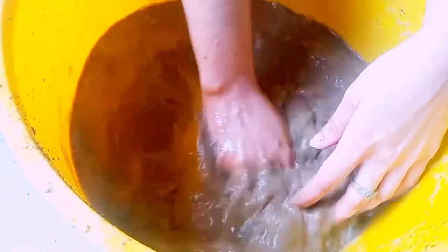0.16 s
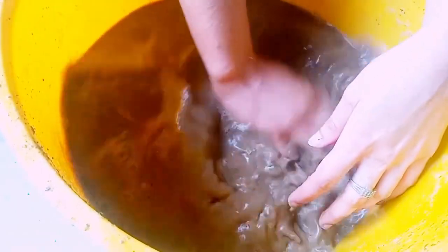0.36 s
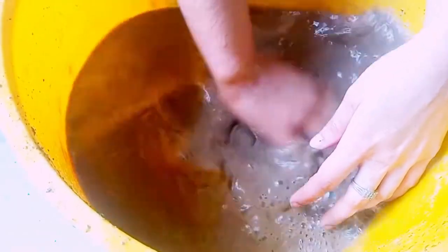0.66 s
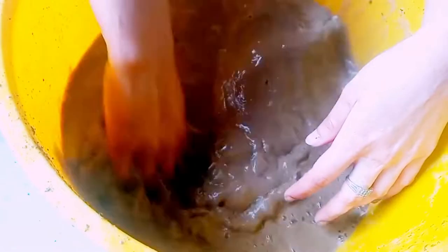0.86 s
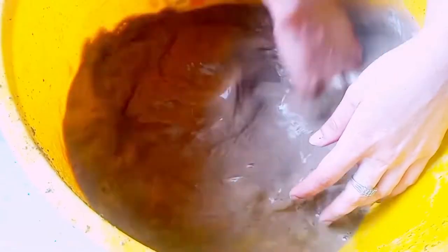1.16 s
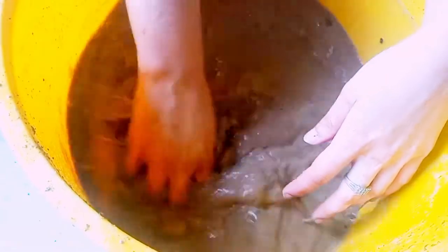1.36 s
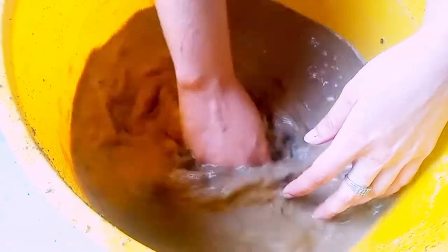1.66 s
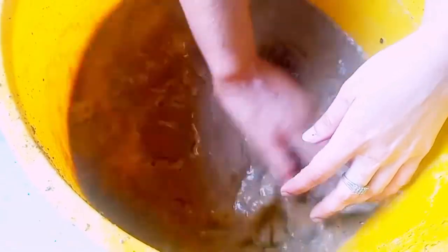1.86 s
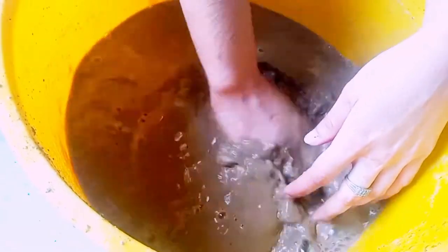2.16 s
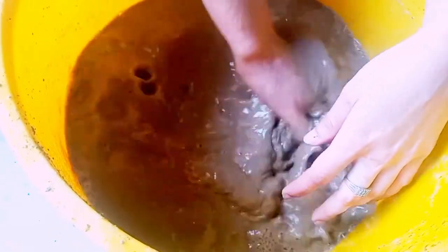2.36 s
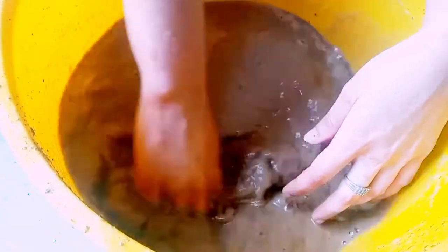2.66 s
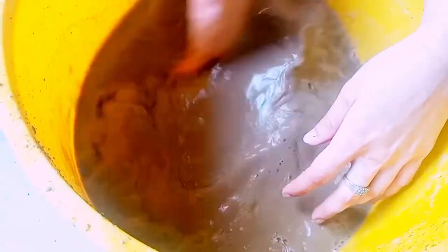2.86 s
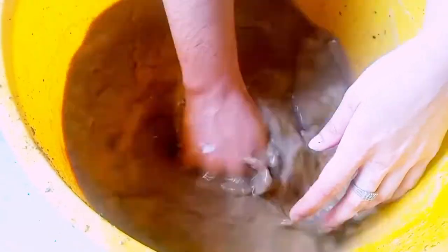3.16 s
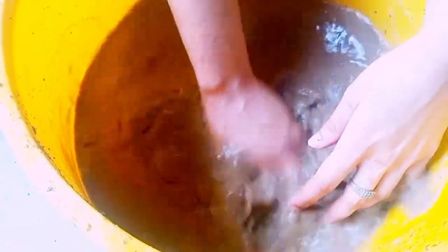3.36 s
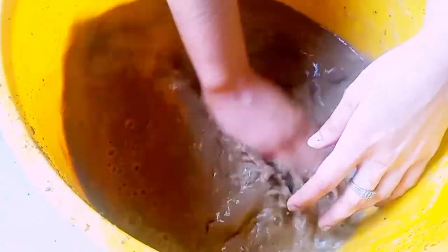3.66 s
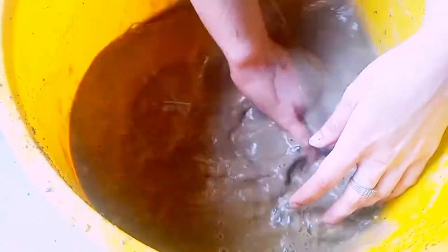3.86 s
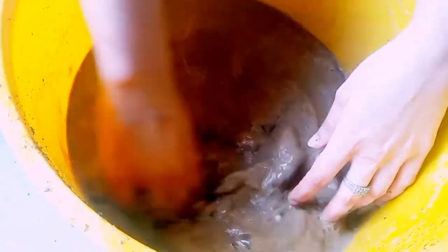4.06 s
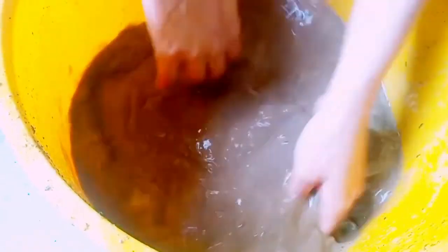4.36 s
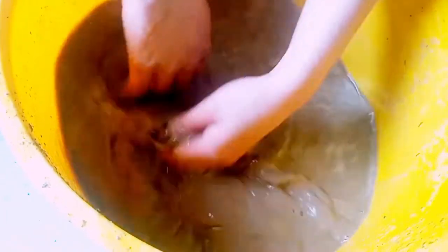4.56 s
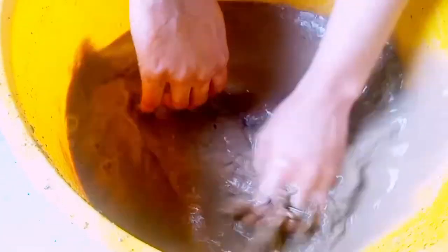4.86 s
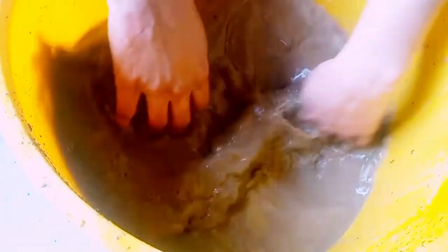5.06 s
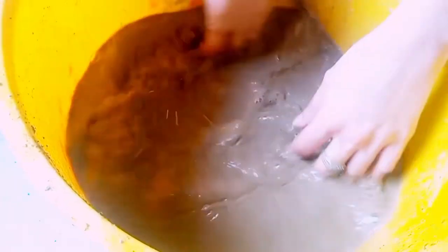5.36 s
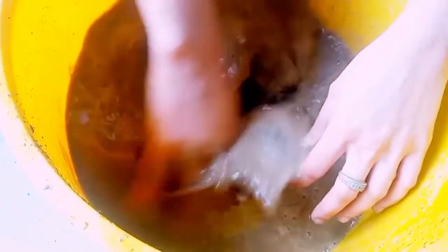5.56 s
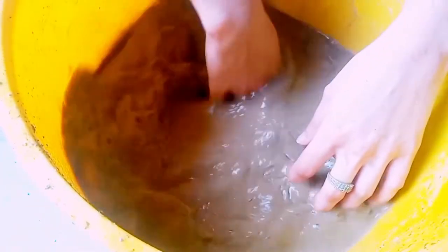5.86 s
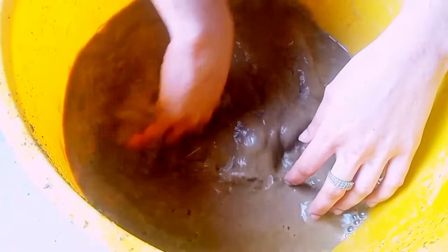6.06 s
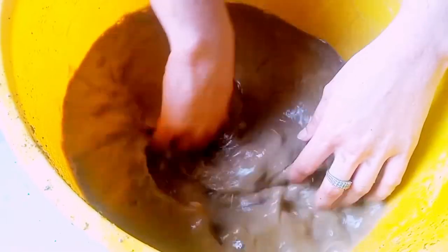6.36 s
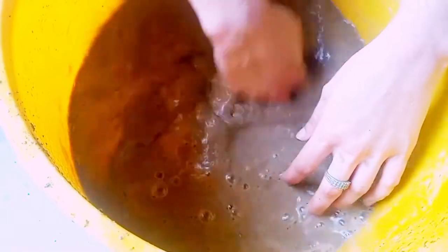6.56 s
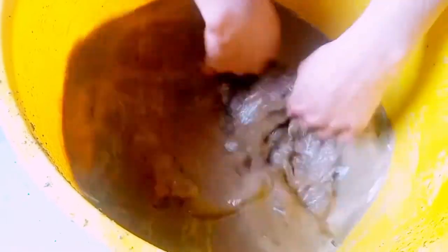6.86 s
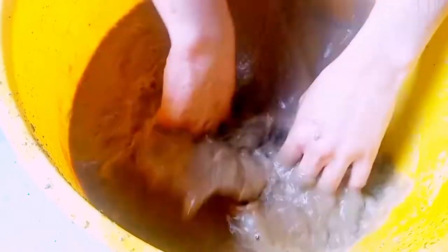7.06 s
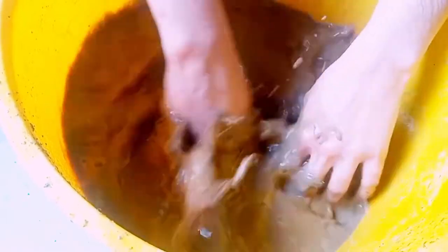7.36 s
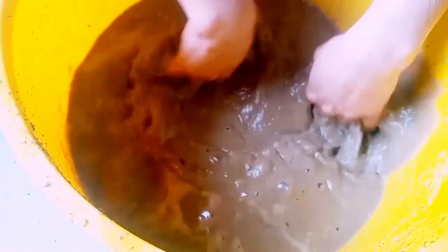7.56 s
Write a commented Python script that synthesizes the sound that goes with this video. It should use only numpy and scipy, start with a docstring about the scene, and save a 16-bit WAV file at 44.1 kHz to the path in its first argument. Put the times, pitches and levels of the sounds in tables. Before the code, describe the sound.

Close wet sloshing and kneading of slurry in a tub, with bubbling gulps, sticky smacks, patters and one deep slap midway.

```python
"""Hands stir and knead clay in a plastic tub of muddy water, close to the microphone in a small room.
Each stroke drives swarms of ringing bubbles over a wash of tearing slurry; big pockets gulp, small
bubbles pop and thrown drops patter back as short rings. Films tick, palms squelch as sliding resonances,
and one deep slap bursts as filtered noise. The tub booms faintly under the work, the room rings on
behind every splash, and still air lies at the bottom as soft noise."""
import sys
import numpy as np
from scipy import signal
from scipy.fft import rfft, irfft
from scipy.io import wavfile
from scipy.ndimage import uniform_filter1d, map_coordinates

SR = 44100
rng = np.random.default_rng(int(sys.argv[2]) if len(sys.argv) > 2 else 0)


def unload_audio(sound):
    """Save the sound as a 16-bit wav file, at the path given as the first command line argument."""
    columns = np.transpose(np.atleast_2d(sound))
    # keep every value between -1 and 1, then stretch to whole-number steps
    steps = np.round(np.clip(columns, -1, 1) * 32767)
    wavfile.write(sys.argv[1], SR, steps.astype(np.int16))


N = 340011
TIME = np.arange(N) / SR
LEAD_IN_S = 0.015  # a burst envelope peaks this long after its start


def undb(db):
    """Decibels to gain."""
    return 10 ** (np.asarray(db) / 20)


def unit(x):
    """Scale to rms 1."""
    return x / np.sqrt(np.mean(x ** 2))


def colour(x, points):
    """Filter by (f/Hz, level/dB) points joined on a log-frequency axis."""
    hz, db = np.transpose(points)
    freq = np.maximum(np.fft.rfftfreq(len(x), 1 / SR), 1)
    gain = undb(np.interp(np.log(freq), np.log(hz), db))
    return irfft(rfft(x) * gain, len(x))


def band(x, lo_hz, hi_hz, order=2):
    """Causal band-pass."""
    edges = [lo_hz, min(hi_hz, 0.45 * SR)]
    return signal.sosfilt(signal.butter(order, edges, "band", fs=SR, output="sos"), x)


def add(track, start_s, sound):
    """Mix a sound into the track."""
    i = int(np.clip(start_s * SR, 0, N - 1))
    track[i:i + len(sound)] += sound[:N - i]


def crackle(per_s, scatter_db):
    """Tiny clicks at random moments, a few strong among many weak."""
    sign = rng.choice([-1, 1], N)
    happens = rng.random(N) < per_s / SR
    strength = undb(scatter_db * np.minimum(rng.exponential(size=N), 4))
    return sign * happens * strength


def burst(lead_s, decay_s):
    """Envelope that builds up to a peak LEAD_IN_S after its start and dies away."""
    t = TIME[:SR // 12] - LEAD_IN_S
    return np.exp(np.minimum(t / lead_s, -t / decay_s))


def bubble(hz, decay_s, swell=0.58, glide=0.0075, choke=0.011):
    """A pinched-off air pocket swells into a ring; mud chokes it and its pitch creeps up as it rises."""
    age = np.arange(int(6 * decay_s * SR) + 4) / SR / decay_s  # in decay times
    shape = (1 - np.exp(-age / swell)) ** 2 * np.exp(-age - choke * age ** 2)
    flow = shape * np.sin(2 * np.pi * hz * decay_s * age * (1 + glide * age))
    pressure = np.diff(flow, prepend=0)  # sound follows the change of the flow
    return pressure / np.abs(pressure).max()


def hollow(length_s, start_hz, end_hz, width, skew=0.57):
    """Turbulence rings a sliding resonance, width its share of the start pitch; it swells fast, then fades."""
    count = int(length_s * SR)
    u = np.arange(count) / count
    hz = start_hz * (end_hz / start_hz) ** u
    narrow = signal.butter(2, width * start_hz / 2, fs=SR, output="sos")
    noise = rng.standard_normal(SR) + 1j * rng.standard_normal(SR)
    flutter = signal.sosfilt(narrow, noise)[-count:]  # the settled end of the filter's output
    ring = np.real(flutter * np.exp(2j * np.pi * np.cumsum(hz) / SR))
    shape = np.sin(np.pi * u ** skew)
    return unit(ring * shape) * np.sqrt(np.mean(shape ** 2))


def cavities(x, depth_db):
    """Gaps between fingers and waves open and collapse, each favouring its own pitch for a moment."""
    per_root_hz, per_s = 0.27, 24  # grain of the random field along pitch and time
    hz, s, frames = signal.stft(x, SR, nperseg=512)
    place = np.meshgrid(per_root_hz * np.sqrt(hz), per_s * s, indexing="ij")
    field = map_coordinates(rng.standard_normal((48, 256)), place, order=3, mode="mirror")
    return signal.istft(frames * undb(depth_db * field), SR)[1][:N]


# pushes, squeezes and lifts of the hands in the tub, close by:
# (start t/s, rise t/s, hold t/s, gulping pockets level/dB, splashing bubbles level/dB, fine spray level/dB)
HAND_STROKES = [(0.002, 0.0013, 0.093, -41.5, -41.5, -43), (0.276, 0.033, 0.061, -41.5, -44, -46),
                (0.388, 0.017, 0.068, -55, -49, -51), (0.542, 0.016, 0.008, -46.5, -48.5, -48.5),
                (0.862, 0.084, 0.15, -63.5, -55.5, -51), (1.128, 0.033, 0.057, -49.5, -53, -59.5),
                (1.238, 0.021, 0.13, -54, -49, -52.5), (1.501, 0.011, 0.02, -61, -59, -47.5),
                (1.572, 0.052, 0.0095, -42.5, -46.5, -53.5), (1.678, 0.017, 0.036, -64, -53, -53.5),
                (1.815, 0.055, 0.087, -48, -41, -41.5), (1.916, 0.0093, 0.096, -40, -38, -37.5),
                (2.052, 0.034, 0.074, -48, -47.5, -64), (2.343, 0.025, 0.081, -49, -49, -52),
                (2.513, 0.0085, 0.071, -69, -59, -55.5), (2.574, 0.044, 0.0082, -66, -44.5, -64),
                (2.772, 0.013, 0.0082, -63, -60.5, -50.5), (2.995, 0.019, 0.018, -57, -50, -50),
                (3.041, 0.075, 0.026, -74, -49.5, -54), (3.174, 0.016, 0.0046, -50.5, -48.5, -44.5),
                (3.26, 0.032, 0.078, -41, -46.5, -51), (3.38, 0.03, 0.052, -56, -48, -49.5),
                (3.498, 0.041, 0.052, -50.5, -47, -57), (3.685, 0.043, 0.0052, -50.5, -42.5, -43),
                (3.815, 0.0055, 0.0029, -52, -43.5, -50), (3.854, 0.021, 0.078, -75, -55, -53.5),
                (4.007, 0.015, 0.073, -49.5, -50, -46.5), (4.237, 0.012, 0.048, -79, -55.5, -58.5),
                (4.668, 0.015, 0.021, -81, -58, -53.5), (4.749, 0.016, 0.012, -53, -46, -49.5),
                (4.895, 0.14, 0.075, -48.5, -45.5, -48.5), (5.017, 0.0051, 0.036, -41, -37, -40),
                (5.323, 0.041, 0.018, -44.5, -39.5, -39.5), (5.401, 0.017, 0.087, -45, -44, -46.5),
                (5.53, 0.02, 0.033, -41.5, -43.5, -45), (5.603, 0.056, 0.12, -41, -37.5, -40.5),
                (5.811, 0.039, 0.085, -46, -40.5, -47), (5.905, 0.0083, 0.056, -43, -41.5, -40),
                (6.136, 0.016, .008, -58, -67, -51), (6.19, 0.0063, 0.012, -49, -59, -43.5),
                (6.234, 0.058, 0.012, -44.5, -43.5, -45.5), (6.377, 0.045, 0.055, -54.5, -50, -49.5),
                (6.549, 0.0047, 0.011, -58, -48.5, -50), (6.638, 0.016, 0.02, -46.5, -42, -45.5),
                (6.685, 0.1, 0.099, -51.5, -48, -46), (6.858, 0.034, 0.013, -45.5, -37.5, -47),
                (6.94, 0.0072, 0.062, -48.5, -35.5, -39), (7.021, 0.019, 0.034, -44, -42, -47.5),
                (7.107, 0.02, 0.052, -76, -49, -41), (7.31, 0.004, 0.12, -49, -42, -43.5),
                (7.449, 0.033, 0.016, -54, -42, -43), (7.577, 0.0065, 0.042, -55, -47, -51.5)]
SAG_DB_PER_S = 18.5  # the water gives way while the hand keeps pushing
RELEASE_DB_PER_S = (313, 261, 316)  # gulps, splash, spray die away once the hand stops
SETTLE_DB, SETTLE_DB_PER_S = -15, 42  # stirred water keeps fizzing after each stroke
IDLE_DB = (-69, -66, -68.5)  # gulps, splash, spray of water that is never quite still


def strokes():
    """Levels of gulps, splash, spray: a stroke rises, holds with a slight sag, lets go, leaves water settling."""
    t = TIME[::40]
    release = np.array(RELEASE_DB_PER_S)[:, None]
    power = undb(IDLE_DB)[:, None] ** 2
    for start_s, rise_s, hold_s, *db in HAND_STROKES:
        rise = np.clip((t - start_s) / rise_s, 0, 1) ** 0.91
        held = np.clip(t - start_s - rise_s, 0, hold_s)
        after = np.maximum(t - start_s - rise_s - hold_s, 0)
        settle_db = SETTLE_DB - SETTLE_DB_PER_S * after
        fall_db = np.maximum(-release * after, settle_db) - SAG_DB_PER_S * held
        power = power + (rise * undb(np.array(db)[:, None] + fall_db)) ** 2
    return [np.interp(TIME, t, 10 * np.log10(p)) for p in power]


def swarm(level_db, per_s, lo_hz, hi_hz, ring_cycles, scatter_db, wash_db, hollow_db,
          even_s=0.038, spurt_db=3):
    """Countless bubbles of one size class, a few strong among many weak, over a wash of tearing slurry."""
    chance = rng.random((16000, 4))
    # thin films of slurry tear in a dense wash that comes in short spurts
    spurts = np.interp(TIME, np.arange(1000) / 120, rng.standard_normal(1000))
    wash = unit(band(crackle(2300, 1.34) * undb(spurt_db * spurts), lo_hz, hi_hz, order=3))
    rings = np.zeros(N)
    for when, size, strength, damping in chance[:int(per_s * N / SR)]:
        hz = lo_hz * (hi_hz / lo_hz) ** size
        # muddy water lets a bubble ring for only a few cycles
        ring = bubble(hz, ring_cycles * 4 ** damping / hz, swell=0.4, glide=0.004)
        add(rings, when * N / SR, undb(-scatter_db * np.log(0.02 + strength)) * ring)
    out = cavities(unit(rings) + undb(wash_db) * wash, hollow_db)
    # the stroke's energy is shared among the bubbles alive at that moment
    window = int(even_s * SR)
    power = uniform_filter1d(uniform_filter1d(out ** 2, window), window // 2)
    return out / np.sqrt(power + 1e-9) * undb(level_db)


# the air column of the tub favours the middle pitches of the big pockets: (f/Hz, level/dB)
TUB_AIR_COLUMN = [(180, -14), (290, -17.5), (430, -8.5), (590, -4), (790, 5), (1000, -2), (3000, -54)]


def churn(smack_db=-11):
    """Three size classes of bubbles follow the hands; sticky clay smacks in hollow clicks among them."""
    gulp_db, splash_db, spray_db = strokes()
    gulps = swarm(gulp_db, per_s=200, lo_hz=315, hi_hz=972, ring_cycles=1.9,
                  scatter_db=8, wash_db=-3, hollow_db=7.0)
    splash = swarm(splash_db, per_s=550, lo_hz=992, hi_hz=2602, ring_cycles=1.9,
                   scatter_db=6.5, wash_db=-3.5, hollow_db=5.5)
    spray = swarm(spray_db, per_s=1000, lo_hz=2897, hi_hz=9500, ring_cycles=2.87,
                  scatter_db=7, wash_db=-2.0, hollow_db=5.0)
    clicks = unit(cavities(band(crackle(200, 1), 1500, 5300), 5.8))
    smacks = clicks * undb(smack_db + (splash_db + spray_db) / 2)
    small = undb(0.96) * (band(splash, 1190, 9400) + band(spray, 2000, 15000))
    return colour(gulps, TUB_AIR_COLUMN) + small + smacks


# single air pockets and drops that ring out in the tub, close by; the rows at 0.828 s and 0.919 s are faint
# repeats of the big gulp at 0.739 s, thrown back by the room: (t/s, f/Hz, peak level/dB, decay t/ms)
RINGING_POCKETS = [(0.1727, 2150, -29, 0.65), (0.3175, 419, -28, 5.2), (0.366, 1413, -29.5, 2),
                   (0.553, 1120, -40, 1.9), (0.739, 402.5, -19, 4.9), (0.7395, 4400, -27, 1.05),
                   (0.793, 391, -31.5, 11), (0.828, 485, -37.5, 5), (0.919, 409, -38.5, 6.3),
                   (0.929, 3640, -37, 2), (0.988, 1750, -34, 2.7), (1.328, 2670, -30.5, 1.9),
                   (1.511, 4070, -32, 0.46), (1.5355, 5460, -28.5, 1.2), (1.6434, 548, -28, 4),
                   (1.9143, 536, -21.5, 1.94), (1.935, 1550, -18.5, 0.32), (1.966, 8060, -20, 0.65),
                   (1.9918, 3140, -22.5, 0.84), (2.062, 688, -29.5, 1.9), (2.1515, 742, -27.5, 3.3),
                   (2.345, 957, -27.5, 2.6), (2.349, 3470, -32.5, 3.1), (2.401, 1520, -34.5, 2.7),
                   (2.595, 3230, -37, 1), (2.6386, 815, -31, 6.8), (2.6454, 508, -39, 4.5),
                   (2.911, 3780, -33.5, 0.89), (2.959, 2840, -27.5, 2.4), (3.0932, 707, -31, 6.1),
                   (3.201, 309, -30, 6.2), (3.278, 520, -32.5, 3.5), (3.3023, 1210, -27, 3.7),
                   (3.32, 1132, -29, 4.1), (3.5596, 4295, -23, 1.7), (3.576, 1184, -31.5, 1.8),
                   (3.659, 723, -31.5, 7.2), (3.942, 3050, -30, 1.6), (4.01, 590, -39, 5.9),
                   (4.035, 658, -23.5, 2.8), (4.081, 2390, -35, 3.3), (4.1142, 2620, -27.5, 1.15),
                   (4.235, 3330, -39, 2.5), (4.6918, 5900, -28, 0.97), (4.7757, 550, -34.5, 3.5),
                   (5.0184, 1012, -15, 2.7), (5.418, 774, -23.5, 3.2), (5.5665, 428, -28.5, 8.2),
                   (5.77, 6130, -30.5, 1.8), (5.788, 1770, -27, 0.94), (5.917, 912, -21.5, 2.6),
                   (5.9178, 1688, -23.5, 3.9), (5.922, 3880, -22, 0.6), (5.9439, 522, -31.5, 7.3),
                   (6.2006, 648, -32, 3.3), (6.2494, 1700, -19.5, 3), (6.2781, 1807, -24, 1.6),
                   (6.256, 7550, -22, 0.68), (6.497, 2730, -40.5, 4.8), (6.511, 2860, -36, 0.37),
                   (6.55, 670, -37, 4.1), (6.624, 3405, -22.5, 1.9), (6.6433, 2340, -30, 3.5),
                   (6.792, 1043, -37, 3.3), (6.946, 5290, -19, 0.69), (6.951, 474, -28.5, 4.7),
                   (7.0048, 3130, -20.5, 0.79), (7.012, 4220, -24.5, 0.88), (7.129, 1674, -25.5, 1.8),
                   (7.13, 3500, -31.5, 1.9), (7.143, 1830, -17, 1.66), (7.3368, 599, -31, 4.5),
                   (7.359, 2600, -26, 0.69), (7.37, 2540, -26, 1.6), (7.586, 2550, -31.5, 2.9)]


def pops(snap_db=-21, snap_s=0.0056, stretch_s=0.0039, tear_db=-16, tear_s=0.00046,
         flutter_db=-24, flutter_s=0.036, width=0.22):
    """Each pocket rings and flutters as its neck closes, in the wet crackle of a film that stretches and tears."""
    rings, snaps = np.zeros(N), np.zeros(N)
    snap = undb(snap_db) * burst(stretch_s, snap_s) + undb(tear_db) * burst(tear_s, tear_s)
    for s, hz, db, decay_ms in RINGING_POCKETS:
        add(rings, s, undb(db) * bubble(hz, decay_ms / 1000))
        add(rings, s - flutter_s / 4, undb(db + flutter_db) * hollow(flutter_s, hz, hz, width))
        # large, slow pockets close softly
        add(snaps, s + 2 * tear_s - LEAD_IN_S, undb(db) * snap / max(1, decay_ms / 2))
    wet_crackle = unit(cavities(band(crackle(6000, 0.78), 930, 6500), 5.2))
    return rings + wet_crackle * snaps


PLUNGE_S = 5.017  # the one deep slap of a hand into the water


def plunge(burst_db=-25, burst_s=0.046, tail_db=-40, tail_s=0.22, attack_s=0.0016):
    """A hand slaps deep into the water: a dense cloud of trapped air bursts at once and seethes away."""
    age = np.maximum(TIME - PLUNGE_S, 0)
    cloud = unit(band(rng.standard_normal(N), 660, 1480, order=3)) * undb(burst_db) * np.exp(-age / burst_s)
    seethe = unit(band(rng.standard_normal(N), 347, 1830, order=4)) * undb(tail_db) * np.exp(-age / tail_s)
    return (cloud + seethe) * (1 - np.exp(-age / attack_s))


# films of slurry that snap with no air behind them, close by: (t/s, level/dB before the click and rip trims)
FILM_SNAPS = [(0.422, -29), (0.7398, -22.5), (1.113, -35.5), (1.198, -29.5), (1.267, -31), (1.814, -26),
              (1.933, -23), (2.206, -29.5), (2.6505, -28), (2.835, -31.5), (2.969, -33.5), (3.036, -29.5),
              (3.731, -20.5), (3.8235, -24.5), (4.0081, -26), (4.114, -29), (4.543, -52), (4.606, -58),
              (4.696, -29.5), (4.77, -34.5), (4.938, -22), (5.028, -18), (5.229, -29.5), (5.357, -20.5),
              (5.375, -22), (5.715, -21.5), (5.749, -27), (5.915, -22), (6.202, -21.5), (6.4168, -20.5),
              (6.957, -14), (7.021, -18), (7.179, -19.5), (7.3187, -25.5), (7.423, -23)]
TICK_HZ, TICK_DECAY_MS = 6770, 0.15  # so short that no pitch is heard


def ticks(rip_db=-13, lead_s=0.0043, rip_s=0.0041, click_db=-2):
    """A film of slurry rips in a quick run of tiny clicks around one sharp one."""
    clicks, rips = np.zeros(N), np.zeros(N)
    for s, db in FILM_SNAPS:
        add(clicks, s, undb(db + click_db) * bubble(TICK_HZ, TICK_DECAY_MS / 1000))
        add(rips, s + lead_s / 2 - LEAD_IN_S, undb(db + rip_db) * burst(lead_s, rip_s))
    tiny_clicks = unit(cavities(band(crackle(7500, 1), 2800, 9900), 3.9))
    return clicks + tiny_clicks * rips


# water forced through a hollow of the hand that opens or closes, close by:
# (t/s, length t/s, start f/Hz, end f/Hz, level/dB at the crest of the swell)
HAND_HOLLOWS = [(0.01, 0.23, 441, 348, -46.5), (0.066, 0.043, 813, 803, -40.5),
                (0.622, 0.044, 880, 810, -52), (0.856, 0.056, 430, 391, -46),
                (1.114, 0.088, 1700, 850, -46.5), (1.21, 0.19, 751, 573, -50.5),
                (1.62, 0.048, 3290, 3120, -38.5), (1.848, 0.055, 514, 459, -38),
                (2.116, 0.053, 2540, 2380, -47.5), (2.773, 0.043, 5300, 5180, -50),
                (2.781, 0.05, 2850, 3000, -56), (2.939, 0.041, 840, 1013, -49.5),
                (3.041, 0.11, 930, 637, -55), (3.285, 0.09, 1189, 1048, -39),
                (3.528, 0.058, 3940, 4390, -47), (3.897, 0.085, 868, 717, -47),
                (4.049, 0.11, 778, 685, -47.5), (4.241, 0.078, 838, 884, -52),
                (5.069, 0.023, 7370, 7460, -39.5), (5.371, 0.081, 775, 801, -37),
                (5.537, 0.18, 446.3, 418, -46.5), (6.202, 0.05, 2063, 1900, -39),
                (6.392, 0.031, 7060, 7600, -39), (6.395, 0.057, 2924, 2480, -43.5),
                (7.393, 0.06, 1153, 1053, -43.5)]


def squelches(width=0.22):
    """Hollow, sliding squishes between palm, clay and water."""
    out = np.zeros(N)
    for s, length_s, start_hz, end_hz, db in HAND_HOLLOWS:
        add(out, s, undb(db) * hollow(length_s, start_hz, end_hz, width))
    return out


# the water-loaded tub walls boom under the kneading:
# (t/s, length t/s, f/Hz, level/dB at the crest of the swell)
WALL_BOOMS = [(3.213, 0.12, 320, -55), (3.72, 0.58, 127, -62.5), (5.044, 0.26, 324, -52.5),
              (5.701, 0.49, 120.2, -54.5), (6.365, 0.13, 225, -58.5), (6.545, 0.19, 125, -55),
              (6.768, 0.054, 105, -55), (7.333, 0.096, 160, -50), (7.45, 0.18, 166, -54.5),
              (7.545, 0.2, 301, -56.5)]


def tub(width=0.22, slosh_db=-75):
    """Clay pushed over the bottom makes the walls boom, over the low gurgle of water rocking to and fro."""
    out = unit(cavities(band(rng.standard_normal(N), 85, 179), 7.7)) * undb(slosh_db)
    for s, length_s, hz, db in WALL_BOOMS:
        add(out, s, undb(db) * hollow(length_s, hz, hz, width))
    return out


# the small room's ring: (f/Hz, reverberation time t/s, level/dB against the direct sound)
ROOM_RING = [(150, 1, -1), (363, 0.98, -11), (680, 0.092, -3.5), (1530, 0.63, -10), (3300, 0.33, -10),
             (7600, 0.49, -13.5)]


def room(x, gap_s=0.0064, build_s=0.00053):
    """Diffuse reflections build up after a short gap; each band of noise fades at its own rate."""
    late = np.maximum(TIME[:SR] - gap_s, 0)
    hz, t60, db = np.transpose(ROOM_RING)
    edges = np.geomspace(100, 12800, 15)
    response = np.zeros(SR)
    for lo, hi in zip(edges, edges[1:]):
        centre = np.log(lo * hi) / 2  # log of the band's middle frequency
        fade = np.exp(-np.log(1000) * late / np.interp(centre, np.log(hz), t60))
        tail = band(rng.standard_normal(SR), lo, hi, order=3) * fade * (1 - np.exp(-late / build_s))
        # at 0 dB the tail carries the same energy in its band as the direct sound
        match = np.sqrt(2 * (hi - lo) / SR / np.sum(tail ** 2))
        response += tail * match * undb(np.interp(centre, np.log(hz), db))
    return signal.fftconvolve(x, response)[:N]


# colour of the still air of the room: (f/Hz, relative level/dB per Hz)
AIR_COLOUR = [(25, -19), (45, -4), (80, -0.5), (130, 6), (200, -1), (400, -10), (1000, -4.5), (8000, -23.5)]
AIR_DB = -67  # rms level


def still_air():
    """The still air of the room: steady noise, strongest in the lows."""
    return unit(colour(rng.standard_normal(N), AIR_COLOUR)) * undb(AIR_DB)


def scene():
    """The water with the room's ring behind it, then the tub and the still air."""
    water = churn() + pops() + plunge() + ticks() + squelches()
    return (water + room(water) + tub() + still_air())[None]


# treble response of the microphone: (f/Hz, level/dB)
MIC_TREBLE = [(6000, 0.5), (8100, 3.5), (8900, -7), (9800, -14), (11300, -21), (12300, -24), (13700, -24),
              (15000, -58)]
TOP_HZ = 15400  # steep cut-off


def record(dry):
    """The microphone lifts the treble slightly near 8 kHz, dulls it above and cuts off steeply at TOP_HZ."""
    dull = colour(dry[0], MIC_TREBLE)
    return signal.sosfilt(signal.ellip(8, 0.2, 70, TOP_HZ, fs=SR, output="sos"), dull)[None]


dry = scene()
out = record(dry)
unload_audio(out)
```